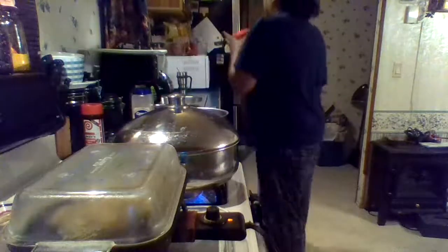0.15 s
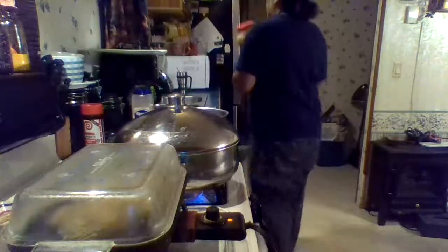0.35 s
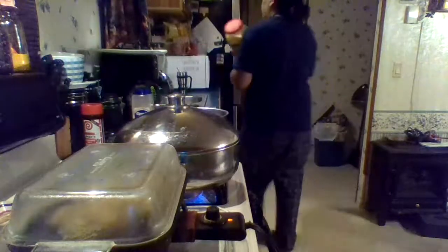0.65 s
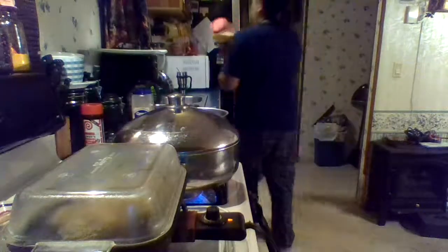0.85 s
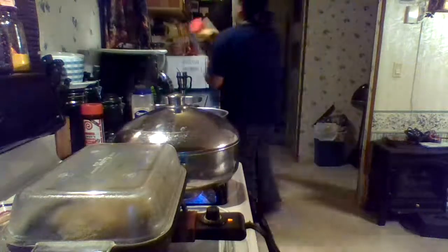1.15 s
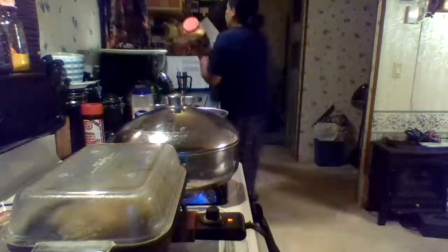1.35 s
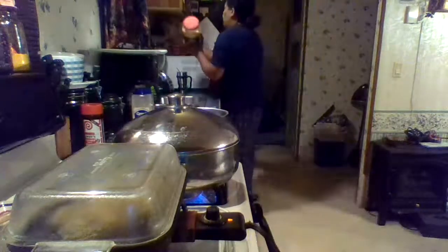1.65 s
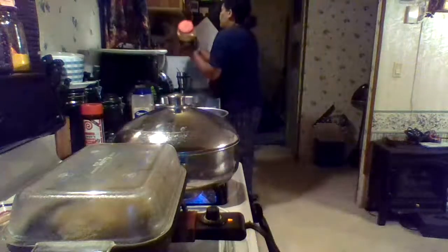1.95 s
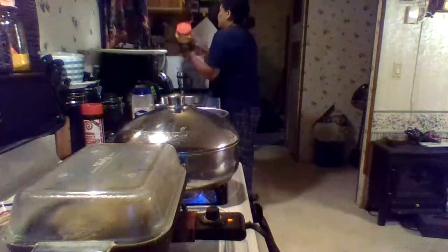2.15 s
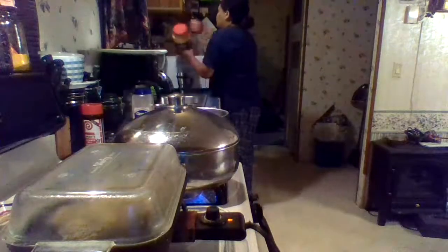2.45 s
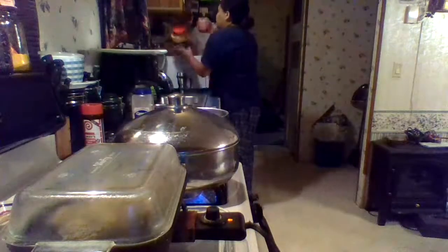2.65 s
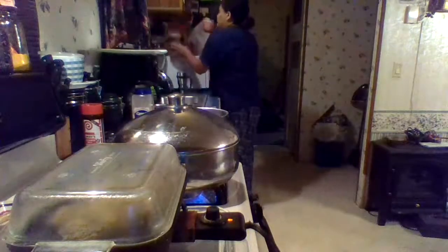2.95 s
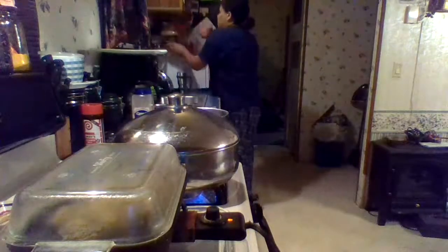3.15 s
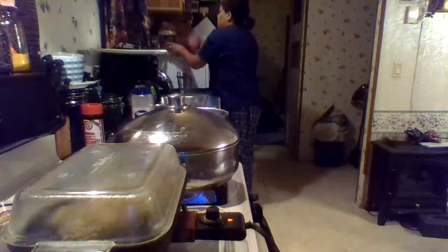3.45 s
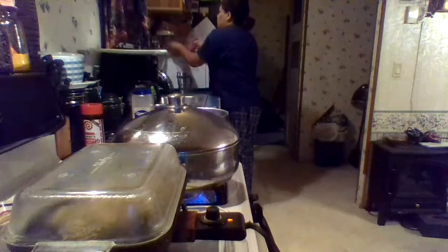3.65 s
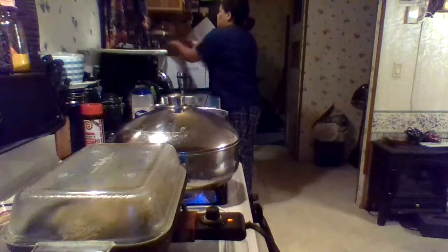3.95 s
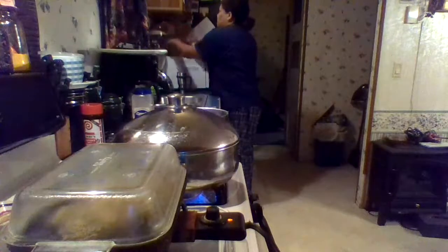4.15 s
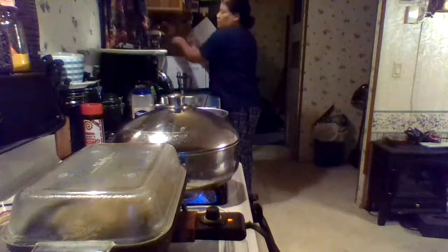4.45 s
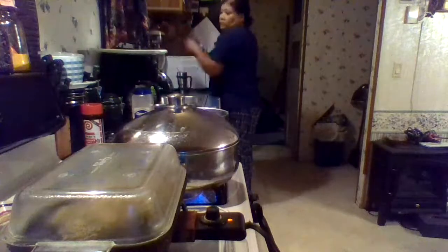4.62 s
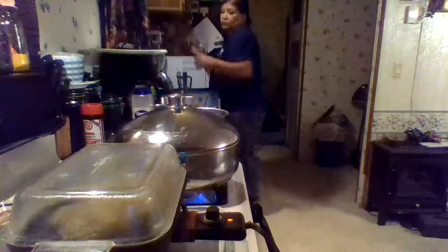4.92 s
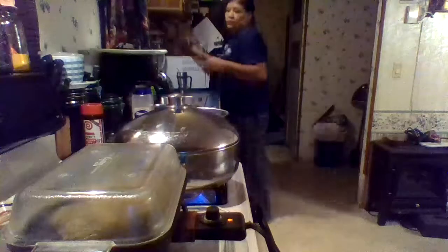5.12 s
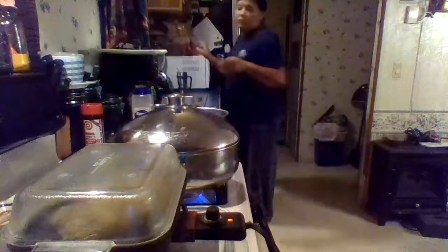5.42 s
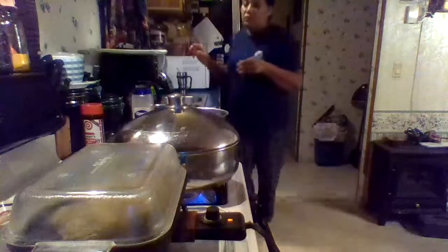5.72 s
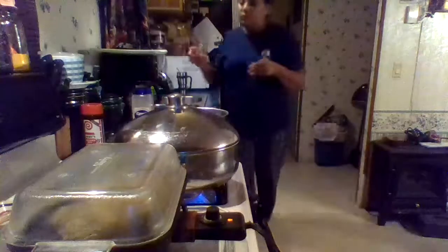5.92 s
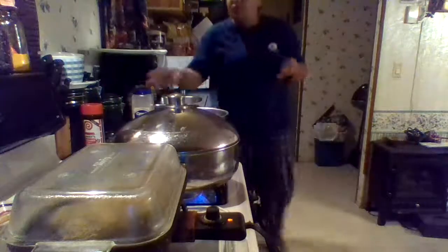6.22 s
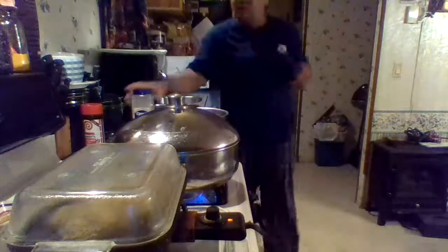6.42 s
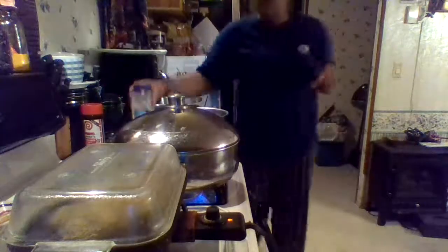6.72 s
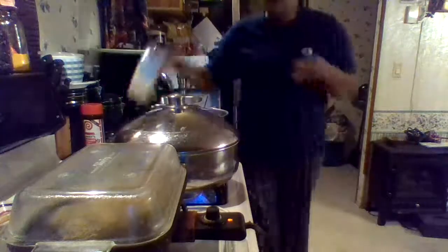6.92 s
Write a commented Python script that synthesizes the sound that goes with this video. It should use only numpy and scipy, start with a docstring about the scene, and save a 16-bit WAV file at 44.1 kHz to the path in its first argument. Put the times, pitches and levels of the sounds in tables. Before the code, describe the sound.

Fish fries in a covered metal pan close to the microphone, in a small kitchen with a short, faint room response. Throughout, a thin bright hiss of spatter and a mid-high bubbling sizzle waver above a low soft simmer and a barely audible hum. Several wet pops a second, mostly very short, ring the lid slightly; crisp droplet cracks with brief spray fall irregularly between them. Pops and spits cluster at 0.3 s and around 1.3. A soft scuff comes at 1.7, and the sharpest spit snaps at 2.1. Low dull thumps sound at 2.7-2.9. After strong spitting near 3.2, the loudest hollow pop bursts at 3.7. Muffled thuds follow at 4.1-4.25, with a light knock at 4.9. Frying continues with strong pops at 5.8, 6.0 and 6.3, faint handling taps between, and a last bright pop just after 7.0 as the sizzle carries on to the end.

```python
"""A small kitchen where fish fries in a covered metal pan.
Steam bubbles burst in the oil as puffs of noise that ring the air and metal under the lid.
Fine spatter hisses, droplets spit as cracks with dying spray, and the oil froths and simmers low.
Jars and steps thud dully on shelf and floor; a low hum and the walls' diffuse answer lie behind."""
import sys
import numpy as np
from scipy import signal
from scipy.fft import rfft, irfft, next_fast_len
from scipy.io import wavfile
from scipy.ndimage import uniform_filter1d, map_coordinates

SR = 44100
rng = np.random.default_rng(int(sys.argv[2]) if len(sys.argv) > 2 else 0)


def inscribe(sig):
    """Save sig as 16-bit PCM at rate SR to the path in sys.argv[1].

    A 1-D sig is mono; a 2-D sig holds one channel per row.
    Samples are clipped to [-1, 1] before scaling.
    """
    pcm = np.round(np.clip(np.atleast_2d(sig).T, -1, 1) * 32767)
    wavfile.write(sys.argv[1], SR, pcm.astype(np.int16))


def rack_gain(trim_db):
    """Turn a fader trim in dB into the linear factor to multiply a signal by."""
    fader = np.asarray(trim_db, float)
    return 10 ** (fader / 20)


N = 312228
ROW = 16384  # samples set aside for one event

# Course of the frying oil. Each row: time in seconds, level in dB of the hiss (before a trim in spatter),
# of the sizzle and of the simmer (mean, before its wobble).
OIL_COURSE = [(0.0, -46.5, -45, -56.5), (0.31, -44, -52.5, -62), (0.45, -42.5, -50.5, -60),
              (0.79, -43, -46, -59.5), (1.16, -42, -45.5, -57.5), (1.79, -45.5, -46.5, -58),
              (2.29, -44, -45, -60), (2.52, -46.5, -50, -59), (3.31, -40.5, -44.5, -55.5),
              (3.49, -52, -49.5, -60), (3.73, -43, -48.5, -57), (3.88, -40.5, -44.5, -57.5),
              (4.18, -40.5, -45.5, -59.5), (4.69, -44.5, -49.5, -60), (5.7, -45, -43, -56.5),
              (6.19, -41, -47.5, -57.5), (6.35, -43.5, -51.5, -57.5), (6.74, -42, -43.5, -60.5),
              (7.08, -44, -42, -54.5)]
# Spectrum of the airborne spatter. Each row: frequency in Hz, relative spectral density in dB.
HISS_SPECTRUM = [(3530, -49), (6000, -9), (6740, -8.5), (7290, -15.5), (7960, -15.5), (9440, -0.5),
                 (11600, -0.5), (12500, 1.5), (14400, 4), (15300, 2), (15750, -22), (16300, -33)]
# Spectrum of the bubbling froth. Each row: frequency in Hz, relative spectral density in dB.
SIZZLE_SPECTRUM = [(470, -29.5), (800, -4), (989, 0.5), (1400, 0.5), (1780, 8), (1960, -25), (2100, 4),
                   (2990, 5), (3230, 4.5), (3600, 8.5), (8000, -2), (10400, -8), (17600, -120)]


def unit(x):
    """Normalisation to an rms of 1."""
    return x / np.sqrt(np.mean(x ** 2) + 1e-20)


def along(points, hz):
    """Spectral envelope: gain interpolated in dB between (Hz, dB) points on a log axis."""
    f, db = np.transpose(points)
    return rack_gain(np.interp(np.log(hz + 1), np.log(f + 1), db))


def filtered(x, response):
    """Linear filtering: the spectrum of x times a response of frequency."""
    size = next_fast_len(x.shape[-1] + 8192)
    spectrum = rfft(x, size) * response(np.fft.rfftfreq(size, 1 / SR))
    return irfft(spectrum, size)[..., :x.shape[-1]]


def resonance(f, hz, width_hz):
    """Damped harmonic oscillator: one causal resonance of peak gain 1."""
    return 1j * f * width_hz / (hz * hz - f * f + 1j * f * width_hz + 1e-9)


def shuffled(db, modes, count, scatter_db):
    """Modal superposition: direct sound plus modes of new strength and sign at each excitation."""
    size = (count, len(db))
    strength = rack_gain(db + scatter_db * rng.standard_normal(size))
    return 1 + (strength * rng.choice([-1, 1], size)) @ modes


def wobble(rate, shape=(N,)):
    """Slow random modulation: smooth curves through rate random knots a second."""
    n = int(np.prod(shape))
    knots = rng.standard_normal(n // 40)
    return map_coordinates(knots, [np.arange(n) * rate / SR], mode="wrap").reshape(shape)


def curves(rows):
    """Linear interpolation: one value per sample for each column after the time."""
    s, *columns = np.transpose(rows)
    return [np.interp(np.arange(N) / SR, s, column) for column in columns]


def placed(rows, times, gains):
    """Superposition in time: each row mixed in at its start."""
    out = np.zeros(N + ROW)
    for row, s, gain in zip(rows, times, gains):
        out[round(max(s, 0) * SR):][:len(row)] += gain * row
    return out[:N]


def rush(spectrum, patchy_db, grainy_db, grain_rate):
    """Turbulent noise of rms 1: random gains over time and frequency, then a grain of quick lumps."""
    z = signal.stft(rng.standard_normal(N + 512), nperseg=512)[2]
    field = uniform_filter1d(uniform_filter1d(rng.standard_normal(z.shape), 7, 0), 7, 1)
    patchy = signal.istft(z * rack_gain(patchy_db * unit(field)), nperseg=512)[1][:N]
    grainy = patchy * rack_gain(grainy_db * wobble(grain_rate))
    return unit(filtered(grainy, lambda hz: along(spectrum, hz)))


def crackle(spectrum, low_hz, high_hz, rate, spread_db, breadth):
    """Shot noise of rms 1: random impulses ring six bands, a few much larger than most."""
    bands_hz = np.geomspace(low_hz, high_hz, num=6)[:, None]
    size = rack_gain(spread_db * np.minimum(rng.exponential(size=(6, N)), 3.5))
    hits = (rng.random((6, N)) < rate / SR) * size * rng.choice([-1, 1], (6, N))

    def response(hz):
        return along(spectrum, hz) * resonance(hz, bands_hz, breadth * bands_hz)
    return unit(filtered(hits, response).sum(0))


def puffs(table, body, attack, lumpy_db, lump_rate, choke):
    """Source and resonator: lumpy noise near a pitch excites a body, whose ringing is then choked."""
    # Each row: start (s), rms dB over the length, pitch (Hz), length (s), bandwidth over pitch, sag (dB).
    s, db, hz, length, spread, sag_db = np.transpose(table)[:, :, None]
    t, f = np.arange(ROW) / SR, np.fft.rfftfreq(ROW, 1 / SR)
    u = t / length
    shape = (1 - np.exp(-t / attack)) * rack_gain(-sag_db * np.minimum(u, 1)) / (1 + u ** 6)
    shape = shape * (1 + 0.6 * np.exp(-t / (4 * attack)))  # the first gulp is the hardest
    vent = shape * rack_gain(lumpy_db * wobble(lump_rate, u.shape)) * rng.standard_normal(u.shape)
    pitched = resonance(f, hz, hz * np.clip(spread, .03, 1.5)) ** 2
    rows = irfft(rfft(vent) * pitched * body(len(table), f))
    rows = rows / (1 + (u / choke) ** 3)
    rms = np.sqrt((rows ** 2).sum(1) / (length[:, 0] * SR))
    return placed(rows, s[:, 0], rack_gain(db[:, 0]) / rms)


def bursts():
    """Bubble venting: each burst excites its pitch, an overtone and an air thump, weaker for higher pitches."""
    # The louder steam bubbles. Each row: start in seconds, rms level in dB, pitch in Hz, length in seconds,
    # bandwidth as a fraction of the pitch (held within .03 to 1.5).
    events = [(0.035, -41, 3140, .076, 0.097), (.116, -40.5, 2200, 0.0091, 0.55),
              (0.145, -42, 2250, 0.017, 0.4), (0.167, -41, 4400, 0.011, 0.08),
              (0.281, -40, 2180, 0.021, 0.49), (0.32, -33, 1700, 0.021, 0.56),
              (0.348, -32, 3220, 0.008, 0.074), (0.35, -44, 6140, 0.057, .5),
              (.365, -32.5, 2900, 0.041, 0.49), (.429, -32.5, 2140, 0.026, 0.2),
              (0.505, -42.5, 4900, 0.053, 0.24), (0.576, -36.5, 3180, 0.08, 0.33),
              (.617, -41, 5400, 0.02, 0.11), (0.743, -45, 2580, 0.0071, 0.17),
              (0.79, -41.5, 2670, 0.032, 0.074), (0.809, -41.5, 4050, 0.02, .14),
              (0.916, -46, 4700, 0.025, 0.13), (0.79, -32, 1730, 0.013, 0.29),
              (0.84, -38, 2290, 0.032, 0.31), (0.939, -35.5, 1990, 0.031, 0.88),
              (0.987, -39.5, 2700, .03, .24), (0.985, -39, 5000, 0.049, 0.31),
              (1.049, -45, 2230, 0.024, 0.88), (1.068, -37.5, 4650, 0.013, 0.083),
              (1.102, -43, 3180, 0.043, 0.23), (1.194, -39, 2970, 0.038, 0.29),
              (1.23, -33, 2930, 0.033, 0.27), (1.236, -45.5, 6240, .04, 0.15),
              (1.284, -33.5, 2070, 0.015, 0.41), (1.314, -25, 2360, 0.0082, 0.14),
              (1.341, -40, 1820, 0.011, 0.28), (1.356, -34, 3070, 0.053, 0.5),
              (1.389, -44.5, 1680, 0.037, .5), (1.493, -36.5, 3530, 0.028, .23),
              (1.528, -37.5, 3120, 0.031, 1), (1.561, -38, 3730, 0.043, 0.56),
              (1.606, -39.5, 2690, 0.03, 0.14), (1.659, -40, 1580, 0.045, 0.45),
              (1.728, -43.5, 3500, 0.11, 1.1), (1.807, -44, 2800, .032, .5),
              (1.809, -31.5, 4270, 0.011, 0.22), (1.839, -34.5, 2950, 0.033, 0.32),
              (1.917, -34, 1850, 0.032, 0.4), (1.943, -31, 3350, 0.049, 0.12),
              (2.014, -39.5, 2120, .031, 0.25), (2.047, -40, 3220, 0.038, 0.37),
              (2.085, -38.5, 6800, 0.04, .48), (2.088, -32, 2920, 0.018, 0.35),
              (2.185, -33.5, 4570, 0.011, 0.1), (2.228, -32.5, 3300, .048, 0.36),
              (2.302, -38, 2930, 0.025, 0.53), (2.392, -39.5, 2770, 0.03, 0.092),
              (2.365, -46.5, 6500, .03, 0.098), (2.446, -43.5, 4700, 0.025, 0.39),
              (2.472, -33.5, 4660, .01, 0.078), (2.462, -33.5, 2700, 0.026, 0.3),
              (2.492, -33.5, 3150, 0.034, 0.34), (2.602, -36.5, 2580, 0.026, 0.25),
              (2.648, -38.5, 2760, 0.038, 0.34), (2.697, -38, 2500, 0.025, 0.32),
              (2.743, -43, 2900, 0.044, 0.38), (2.799, -38, 3040, 0.015, 0.29),
              (2.835, -37.5, 2100, 0.025, 0.55), (2.889, -30, 2240, 0.012, 0.33),
              (2.931, -36.5, 3200, 0.017, 0.072), (3.102, -45.5, 4150, .03, 0.29),
              (3.113, -33, 1860, 0.046, 0.44), (3.312, -40.5, 2550, 0.015, 1.1),
              (3.658, -34, 2440, 0.086, 0.19), (3.701, -17.5, 1860, 0.017, 0.26),
              (3.71, -40, 6600, 0.09, 0.3), (3.73, -25.5, 1840, 0.016, 0.33),
              (3.757, -34.5, 4330, 0.028, .6), (3.856, -47, 3000, .03, 0.26),
              (3.881, -29, 2720, 0.031, 0.15), (3.911, -41, 4840, 0.036, 0.77),
              (3.924, -32, 2350, 0.022, 0.77), (4.007, -44.5, 5800, 0.062, 0.75),
              (4.026, -38.5, 2350, 0.027, 0.48), (4.069, -39, 2350, 0.022, 0.21),
              (4.07, -35.5, 4200, 0.013, 0.18), (4.093, -31, 2220, 0.01, 0.21),
              (4.095, -31, 2400, 0.0035, 0.58), (4.144, -37, 2780, 0.024, .5),
              (4.228, -32, 2930, 0.028, .2), (4.268, -35.5, 4020, 0.036, 0.16),
              (4.306, -35, 1770, 0.026, 0.24), (4.329, -37, 2680, 0.04, 0.31),
              (4.377, -34.5, 2940, 0.022, 0.52), (4.386, -36.5, 2570, 0.032, 0.36),
              (4.498, -39, 1980, .063, 0.4), (4.541, -40, 3300, 0.032, .17),
              (4.618, -37, 2570, 0.017, 0.23), (4.733, -42, 6150, 0.022, 0.14),
              (4.748, -38, 4300, .062, 0.54), (4.809, -34.5, 2260, 0.027, .5),
              (4.898, -38.5, 4170, 0.015, 0.22), (4.917, -35, 1820, 0.012, 1.1),
              (4.941, -36, 2200, 0.025, 0.34), (4.978, -36.5, 2880, 0.028, 0.21),
              (5.095, -42.5, 3540, 0.019, 0.59), (5.123, -36, 2940, .022, 0.27),
              (5.138, -35.5, 1360, 0.025, 0.48), (5.182, -31, 2600, 0.01, 0.18),
              (5.184, -35.5, 1350, .024, 0.39), (5.244, -36, 4360, 0.028, 0.17),
              (5.351, -45, 2140, 0.014, 0.087), (5.46, -52, 946, 0.085, 0.095),
              (5.488, -41, 2530, 0.015, 0.14), (5.514, -31.5, 2560, 0.017, 0.4),
              (5.552, -36, 2230, 0.043, 0.43), (5.621, -33, 1750, 0.019, 0.32),
              (5.756, -37, 1700, 0.017, 0.24), (5.804, -35.5, 2830, 0.044, 0.28),
              (5.81, -27, 1520, 0.016, 0.22), (5.865, -35, 3420, 0.018, .41),
              (5.878, -38, 1750, 0.051, 0.53), (5.888, -30.5, 3820, 0.024, 0.15),
              (5.891, -34.5, 3900, .004, 0.75), (5.917, -39, 3670, 0.021, .5),
              (5.984, -27, 1797, 0.033, 0.12), (6.027, -31.5, 3930, 0.062, .35),
              (6.041, -39.5, 2696, 0.042, 0.046), (6.09, -44, 3740, 0.0083, 0.2),
              (6.145, -41, 2840, 0.027, 0.18), (6.22, -45.5, 5600, 0.049, .17),
              (6.218, -51.5, 1070, 0.066, 0.43), (6.238, -35, 3060, 0.052, 0.35),
              (6.286, -28.5, 2540, .015, 0.17), (6.287, -33, 2580, 0.003, 1.1),
              (6.31, -33, 2670, 0.013, 0.27), (6.386, -39.5, 3650, 0.027, .39),
              (6.491, -36.5, 2740, 0.029, 0.33), (6.585, -35.5, 2120, 0.031, 0.74),
              (6.602, -41.5, 4800, .07, 0.43), (6.684, -45, 5560, .05, .45),
              (6.695, -33.5, 2770, 0.038, 0.22), (6.775, -31, 3560, 0.0088, 0.38),
              (6.864, -35.5, 2650, 0.018, 0.25), (6.89, -34.5, 4450, 0.018, 0.19),
              (6.993, -33, 2810, 0.052, 0.31), (7.035, -26, 2060, 0.026, 0.18)]
    s, db, hz, length, spread = np.transpose(events)
    same = np.ones(len(s))
    sag_db = 5 * same
    main = [s, db, hz, length, spread, sag_db]
    over = [s, db - 15.5, hz * 1.828, length, 0.57 * same, sag_db]
    # The thump of the air under the lid grows 0.52 dB per dB of the bubble
    # and loses 14 dB for each octave of pitch.
    gulp_db = -47.5 + 0.52 * (db + 32) - 14 * np.log2(hz / 1500)
    gulp = [s, gulp_db, 993 * same, 0.033 * same, 0.3 * same, sag_db]
    return puffs(np.hstack([main, over, gulp]).T, lid, attack=.001, lumpy_db=4.5, lump_rate=250., choke=1.9)


def lid(count, f):
    """Modal resonance of the metal lid and the air under it."""
    # Modes. Each row: frequency in Hz, free decay by 60 dB in seconds, level in dB before a common 9 dB lift.
    lid_modes = [(990, .08, -4), (1130, .1, -6), (1328, .16, -3), (1579, .14, -3), (1720, .1, -4),
                 (1793, .2, 1), (1845, .12, -3), (2133, .17, 1), (2286, .1, -3), (2420, .16, 0),
                 (2560, .13, -2), (2653, .17, 1), (2851, .16, 0), (2905, .11, -3), (3150, .18, 1),
                 (3293, .14, 0), (3410, .11, -2), (3627, .15, -1), (4070, .09, -3), (4198, .12, 0),
                 (4348, .12, -2), (4585, .1, -2), (4800, .09, -3), (5270, .09, -3), (6050, .07, -3),
                 (6700, .07, -3)]
    hz, t60, db = np.transpose(lid_modes)
    width_hz = np.log(1000) / np.pi / t60
    return shuffled(db + 9.0, resonance(f, hz[:, None], width_hz[:, None]), count, scatter_db=7.0)


def spits():
    """Impulsive ejection: a droplet cracks, and its spray decays exponentially, longer for a louder one."""
    # The louder droplets. Each row: start in seconds, peak level in dB, spray in dB relative to the crack.
    droplets = [(0.1196, -24, -15), (0.176, -31.5, -23), (0.206, -28, -17), (0.312, -25.5, -14),
                (0.3284, -19, -17), (0.3611, -19.5, -10), (0.461, -31, -17), (0.4868, -26, -17),
                (0.571, -22, -10), (0.826, -28, -9), (0.9193, -27, -15), (1.127, -20, -15),
                (1.1393, -24, -17), (1.16, -20, -19), (1.197, -18, -18), (1.2835, -32, -19),
                (1.327, -17.5, -17), (1.4476, -25, -15), (1.5035, -35, -17), (1.6152, -29, -19),
                (1.694, -24, -17), (1.7545, -16, -18.5), (1.8128, -19, -17), (2.0365, -31, -14),
                (2.0846, -8.5, -13.5), (2.1665, -33, -17), (2.2273, -31, -17), (2.2463, -21, -15),
                (2.3775, -33, -17), (2.392, -21, -17), (2.461, -32, -19), (2.4748, -23.5, -13),
                (2.604, -23, -19), (2.6404, -31, -17), (2.6686, -28, -19), (2.7871, -28, -15),
                (2.8786, -21, -18), (3.007, -23, -14), (3.1318, -33, -17), (3.232, -14.5, -16),
                (3.295, -18.5, -21), (3.3508, -26, -13), (3.3926, -25, -17), (3.44, -21, -25),
                (3.512, -27.5, -16), (3.699, -25, -17), (3.7195, -16, -14), (3.9095, -27, -17),
                (4.023, -27, -17), (4.0776, -31, -17), (4.1116, -36, -17), (4.196, -19, -13),
                (4.636, -23, -16), (4.7152, -30, -12), (4.953, -27, -15), (4.997, -21, -21),
                (5.1267, -21, -16), (5.1913, -25, -12), (5.5294, -23, -22), (5.6181, -24, -17),
                (5.7396, -14.5, -16), (5.799, -26, -15), (6.0092, -27, -23), (6.2622, -29, -17),
                (6.351, -23, -11), (6.3774, -18, -15), (6.5904, -18, -19), (6.768, -43, -17),
                (6.862, -25, -15), (6.995, -24, -16)]
    s, db, spray_db = np.vstack([droplets, small_spits(count=70)]).T[:, :, None]
    t = np.arange(ROW // 2) / SR
    crack = rack_gain(-60 * t / .0014)
    spray_t60 = 0.072 * rack_gain(0.21 * (db + 32))
    spray = (1 - np.exp(-t / .001)) * rack_gain(spray_db - 60 * t / spray_t60)
    shape = crack + spray
    tilt_db = 4.5 * rng.standard_normal(s.shape)  # each droplet's own brightness, dB per octave

    def colour(hz):
        return along(HISS_SPECTRUM, hz) * rack_gain(tilt_db * np.log2(np.clip(hz, 7000, 16000) / 12000))
    rows = filtered(shape * rng.standard_normal(shape.shape), colour)
    return placed(rows, s[:, 0], rack_gain(db[:, 0]) / np.abs(rows).max(1))


def small_spits(count):
    """Uniformly random arrivals: lesser droplets as rows of start (s), peak dB and spray dB."""
    draw = rng.random((count, 3))
    peak_db, spray_db = -35 + 10 * draw[:, 1], -26 + 16 * (draw[:, 2] - .5)
    return np.transpose([draw[:, 0] * N / SR, peak_db, spray_db])


def spatter(bubbles):
    """Dense random superposition: droplets merge into a hiss that swells with the power of the bursts."""
    power = np.abs(uniform_filter1d(bubbles ** 2, size=600))
    thrown = 1 + np.sqrt(power) / rack_gain(-42.5)
    spray = rush(HISS_SPECTRUM, patchy_db=2.4, grainy_db=1.5, grain_rate=400.)
    ticks = crackle(HISS_SPECTRUM, 6800, 13100, rate=220.0, spread_db=15.0, breadth=0.07)
    flutter = rack_gain(1.9 * wobble(55.))
    hiss_db = curves(OIL_COURSE)[0] - 3.5
    return rack_gain(hiss_db) * thrown ** 0.31 * flutter * (spray + rack_gain(-8.5) * ticks)


def oil():
    """Collective bubble noise: a froth of small bursts under the lid, over a low simmer."""
    # Spectrum of the simmer. Each row: frequency in Hz, relative spectral density in dB.
    simmer_spectrum = [(100, -55), (170, -22), (248, -4), (295, 0), (334, 2), (421, 6), (445, 3),
                       (487, -11.5), (522, -7.5), (622, 2.5), (715, -6), (834, -80), (900, -2), (1170, -75),
                       (1980, -120)]
    _, sizzle_db, simmer_db = curves(OIL_COURSE)
    froth = rush(SIZZLE_SPECTRUM, patchy_db=9.0, grainy_db=4.0, grain_rate=250.0)
    froth = froth + 0.87 * small_bubbles(count=850)
    unsteady = rack_gain(simmer_db + 2.2 * wobble(14.))
    simmer = unsteady * rush(simmer_spectrum, patchy_db=2.4, grainy_db=1.5, grain_rate=80.)
    return rack_gain(sizzle_db) * unit(froth) + simmer


def small_bubbles(count):
    """Random superposition of resonant bursts: lesser bubbles at random moments and pitches, rms 1."""
    draw = rng.random((count, 4))
    s, length = draw[:, 0] * N / SR, .012 + .03 * draw[:, 3]
    hz = 1000 * (7500 / 1000) ** draw[:, 1]
    # A band that widens with pitch needs more power for the same density.
    db = 20 * np.log10(along(SIZZLE_SPECTRUM, hz) * np.sqrt(hz)) + 2.1 * draw[:, 2]
    same = np.ones(count)
    table = np.transpose([s, db, hz, length, .24 * same, 7 * same])
    return unit(puffs(table, lid, attack=.001, lumpy_db=4.0, lump_rate=300., choke=1.9))


def knocks():
    """Contact excitation: soft impacts and scuffs rattle the wood at a low pitch."""
    # Handling and steps. Each row: start in seconds, rms level in dB, pitch in Hz, length in seconds,
    # bandwidth as a fraction of the pitch (held within .03 to 1.5).
    contacts = [(1.693, -40.5, 474, 0.11, 0.87), (1.708, -45, 114, 0.063, 0.56),
                (1.733, -50, 1060, 0.082, 1), (1.847, -49.5, 403, 0.029, .5),
                (2.113, -48, 630, 0.023, 0.13), (2.719, -30.5, 65, 0.054, 1), (2.735, -41, 340, 0.041, 1),
                (2.828, -38, 68, 0.075, 1.36), (3.004, -53, 108, 0.043, 0.37),
                (3.703, -47.5, 400, 0.099, 1.3), (2.87, -52.5, 215, .06, 0.52),
                (3.894, -51, 394, 0.04, 0.47), (4.137, -39, 75.5, 0.11, 1.3),
                (4.15, -37.5, 423, 0.089, 0.79), (4.246, -36, 115, 0.038, 0.63),
                (4.251, -50.5, 327, 0.092, 1), (4.87, -41.5, 513, 0.076, 1.1),
                (5.426, -48.5, 423, 0.06, 0.7), (5.705, -47, 420, .017, 0.24),
                (5.812, -46, 690, 0.006, 0.28), (5.973, -45.5, 543, 0.036, 1.1),
                (6.385, -48.5, 396, 0.03, 0.38), (6.5, -45, 75, 0.037, 0.84),
                (6.703, -51.5, 256, 0.057, 0.21)]
    table = [(*row, 5) for row in contacts]  # each sags 5 dB over its length
    return puffs(table, shelf, attack=.011, lumpy_db=4.5, lump_rate=110., choke=2.2)


def shelf(count, f):
    """Modal resonance: the hollow answer of the wood."""
    # Wood and floor modes. Each row: frequency in Hz, width in Hz, level in dB before random scatter.
    wood_modes = [(69, 20, 0.5), (118, 35, -3), (251, 40, 0), (336, 50, -3), (425, 35, 5), (508, 50, -4),
                  (630, 50, 4), (760, 60, -2)]
    hz, width_hz, db = np.transpose(wood_modes)
    return shuffled(db, resonance(f, hz[:, None], width_hz[:, None]), count, scatter_db=3)


def hum():
    """Band-shaped noise with slow modulation: the kitchen's low, unsteady hum."""
    # Spectrum of the hum. Each row: frequency in Hz, relative spectral density in dB.
    hum_spectrum = [(15, -44), (25, -51), (43, -8), (70, -16), (119, -2), (139, -6.5), (162, -19),
                    (200, -18), (260, -50), (440, -120)]
    unsteady = rack_gain(-69 + 1.5 * wobble(3.))
    return unsteady * rush(hum_spectrum, patchy_db=1.5, grainy_db=1, grain_rate=20.)


def kitchen(x):
    """Diffuse reverberation: the walls answer after 4 ms with noise that falls 60 dB in 0.3 s."""
    t = np.arange(SR // 3) / SR
    tail = rng.standard_normal(len(t)) * rack_gain(-60 * t / 0.3) * (t > .004)
    return signal.fftconvolve(x, tail / np.linalg.norm(tail))[:N]


def scene():
    """Superposition of sources: bursts, spits and knocks with their reverberation, then the steady layers."""
    bubbles = bursts()
    near = bubbles + spits() + knocks()
    walls = rack_gain(-15) * kitchen(near)
    return (near + walls + spatter(bubbles) + oil() + hum())[None]


def top_cut(x):
    """Nothing passes above the cut-off."""
    return signal.sosfilt(signal.butter(12, 16980, fs=SR, output="sos"), x)


def record(dry):
    """Band limiting: the sound is cut off sharply at 15850 Hz."""
    mix = filtered(dry, lambda hz: hz < 15850)
    return top_cut(mix)


dry = scene()
out = record(dry)
inscribe(out)
```